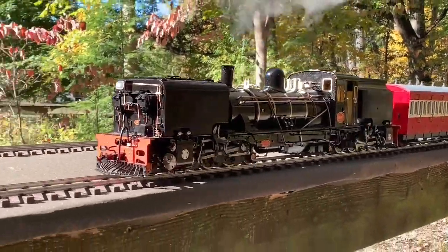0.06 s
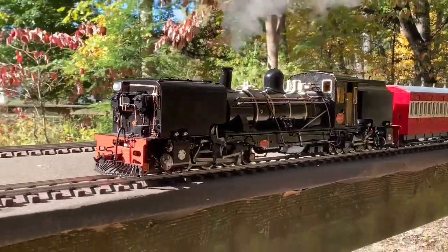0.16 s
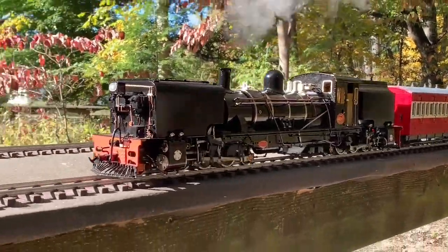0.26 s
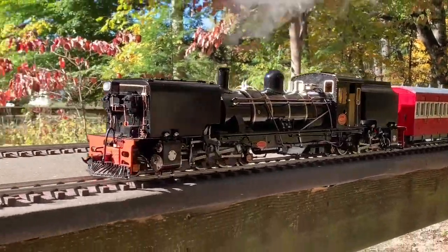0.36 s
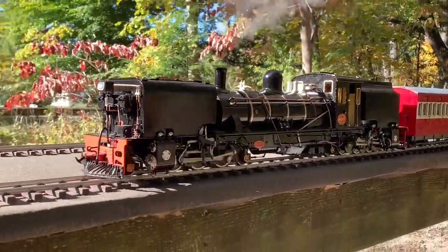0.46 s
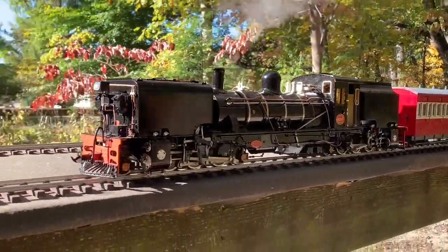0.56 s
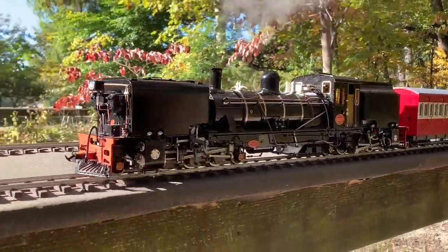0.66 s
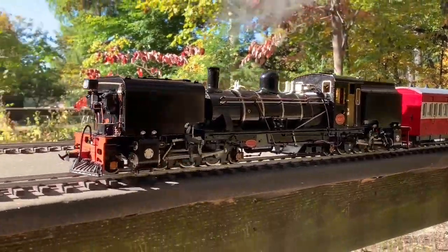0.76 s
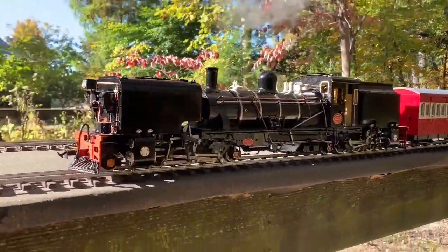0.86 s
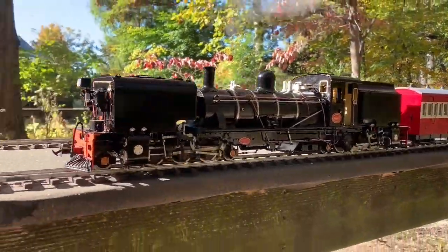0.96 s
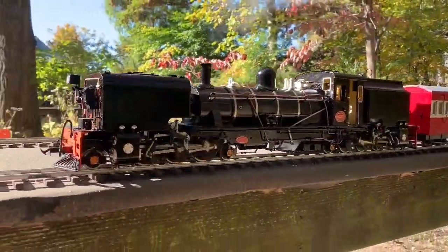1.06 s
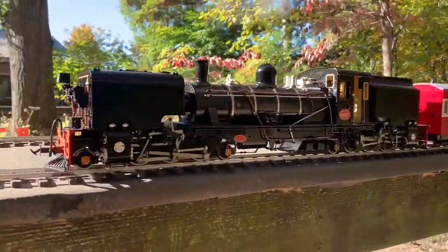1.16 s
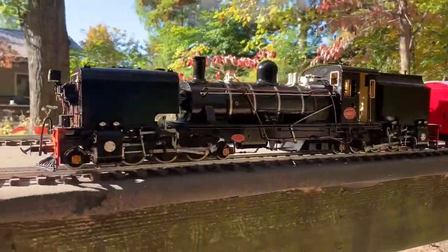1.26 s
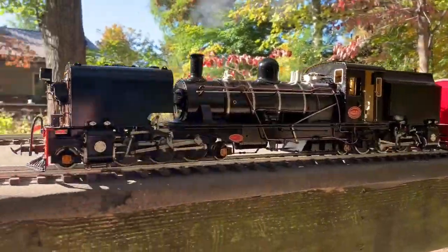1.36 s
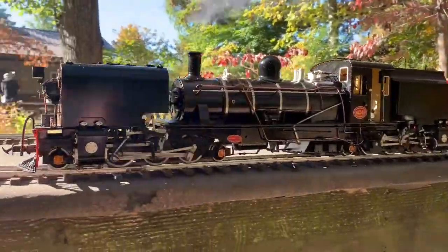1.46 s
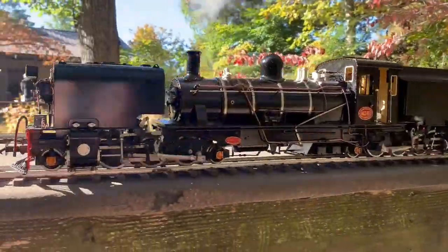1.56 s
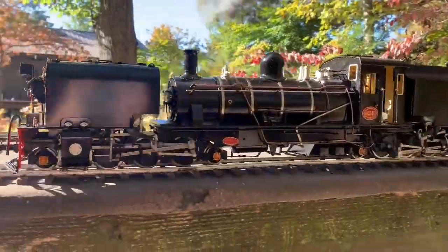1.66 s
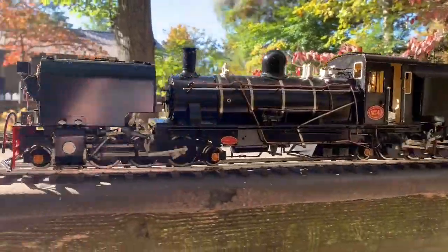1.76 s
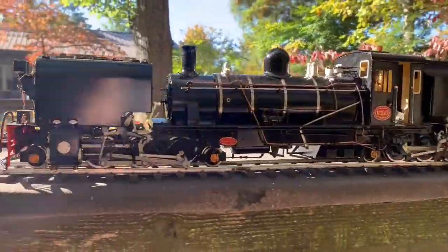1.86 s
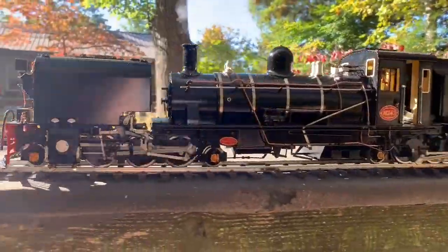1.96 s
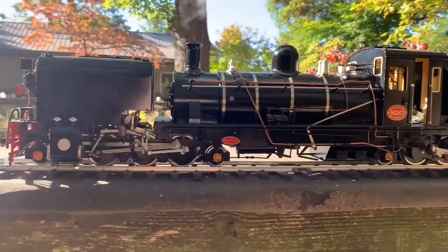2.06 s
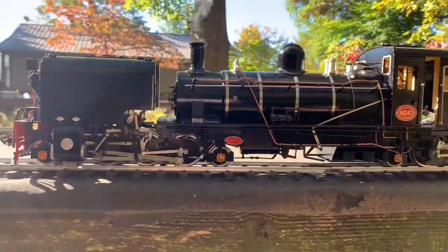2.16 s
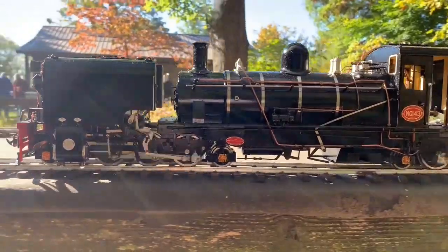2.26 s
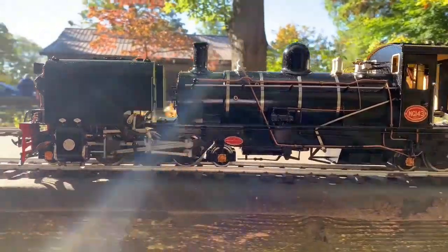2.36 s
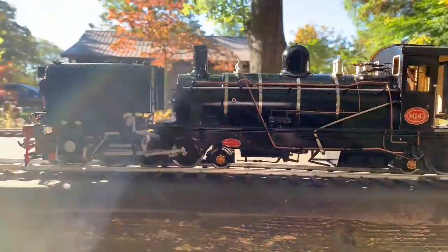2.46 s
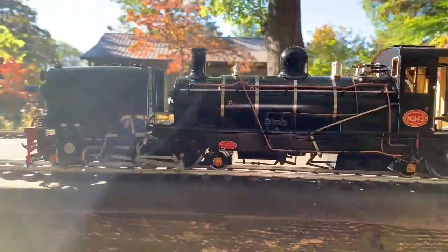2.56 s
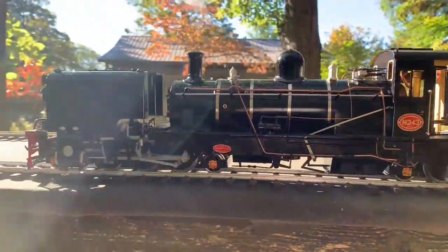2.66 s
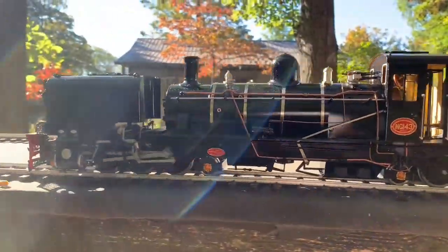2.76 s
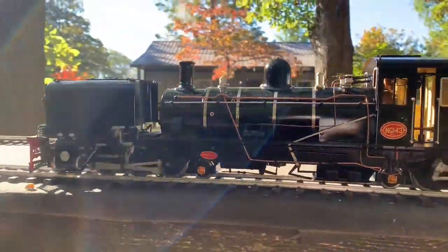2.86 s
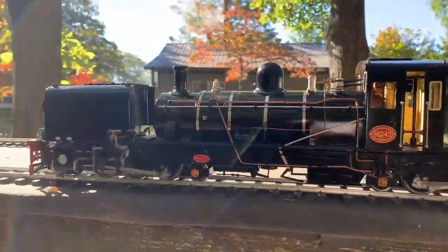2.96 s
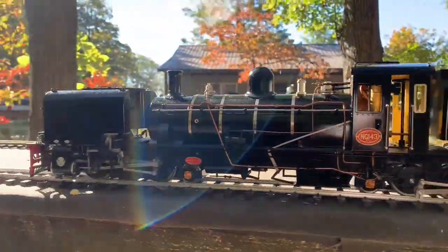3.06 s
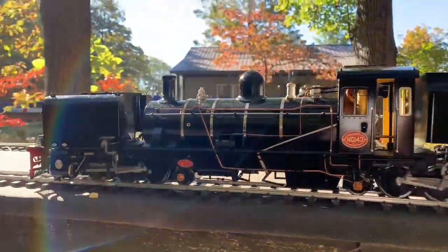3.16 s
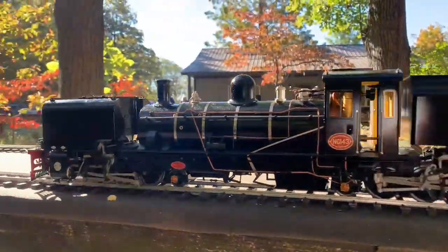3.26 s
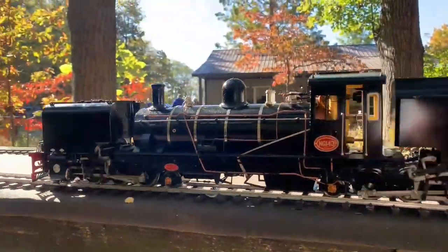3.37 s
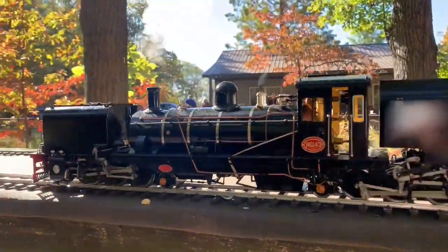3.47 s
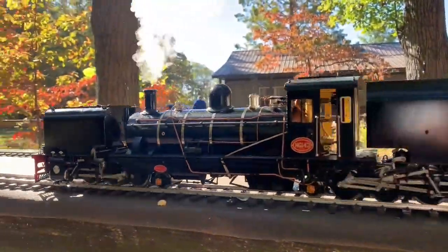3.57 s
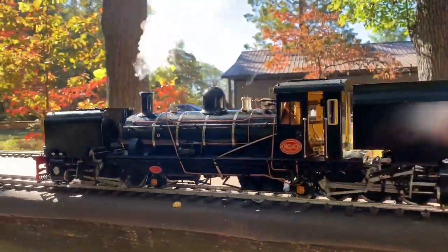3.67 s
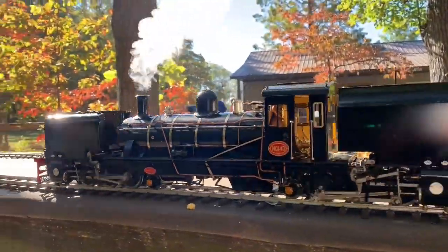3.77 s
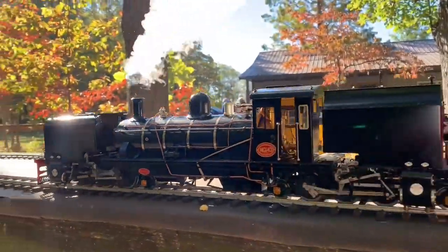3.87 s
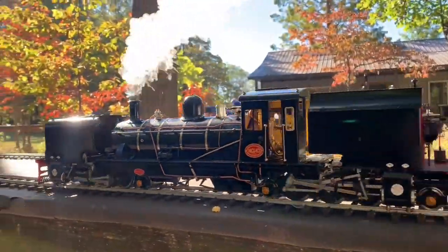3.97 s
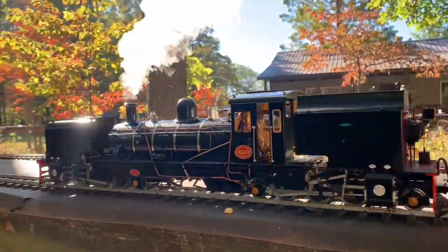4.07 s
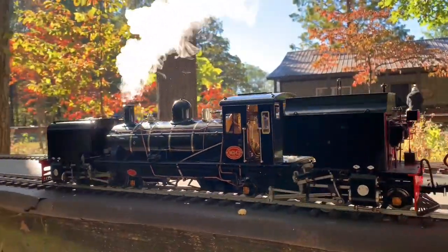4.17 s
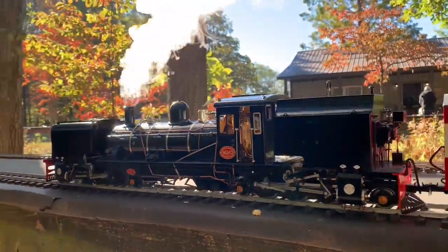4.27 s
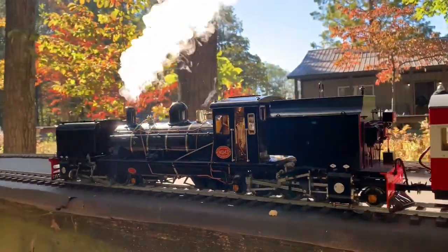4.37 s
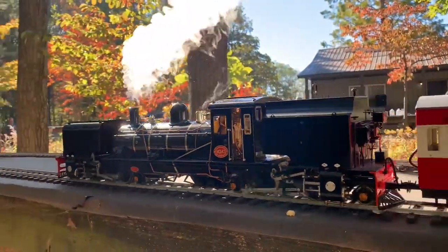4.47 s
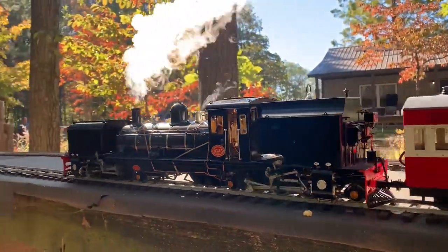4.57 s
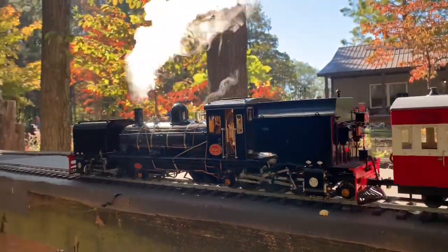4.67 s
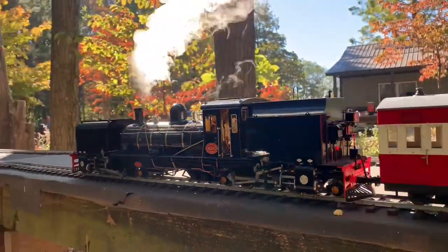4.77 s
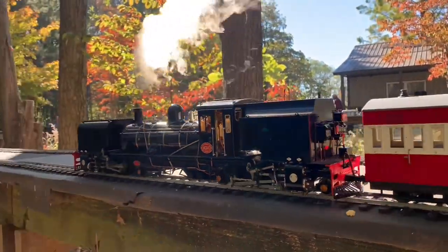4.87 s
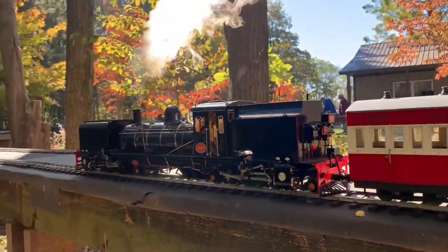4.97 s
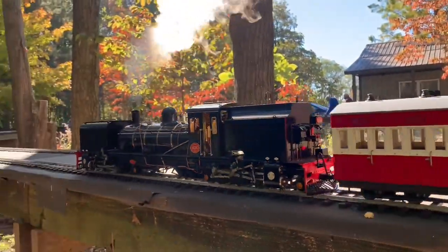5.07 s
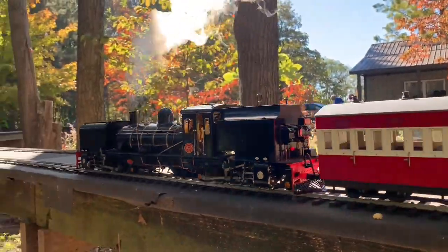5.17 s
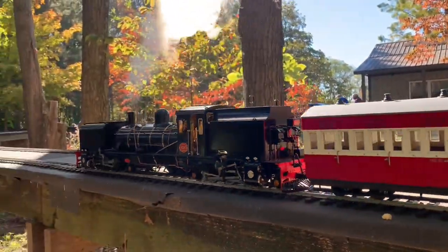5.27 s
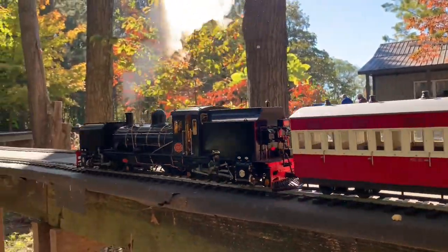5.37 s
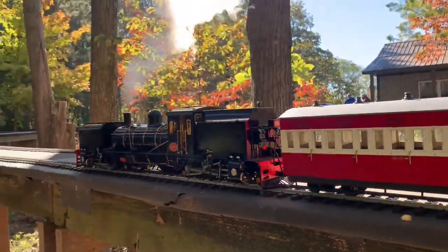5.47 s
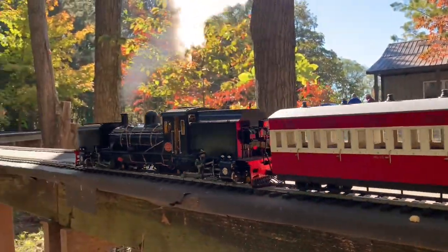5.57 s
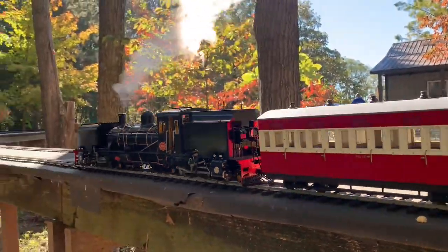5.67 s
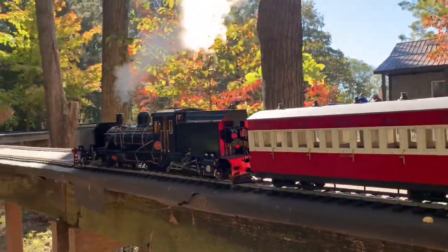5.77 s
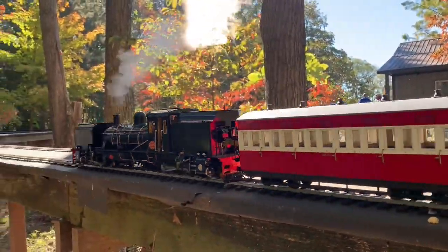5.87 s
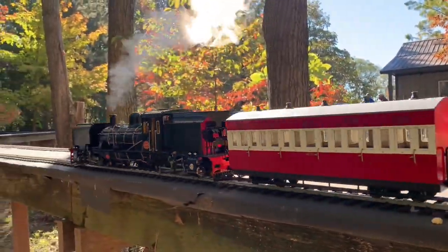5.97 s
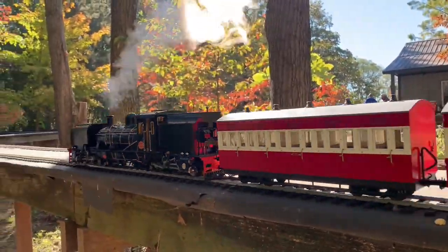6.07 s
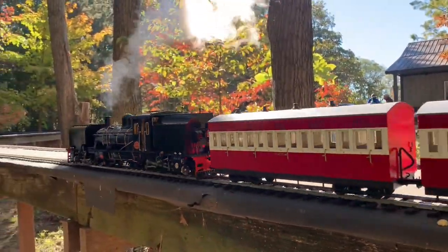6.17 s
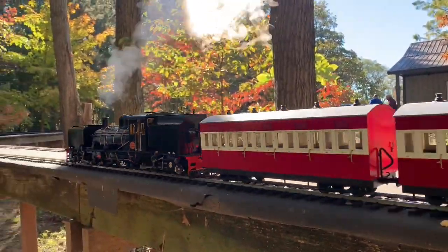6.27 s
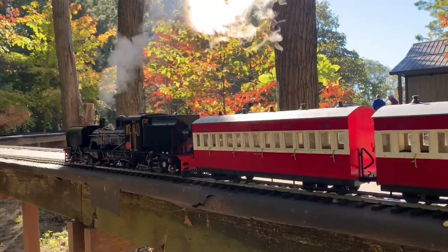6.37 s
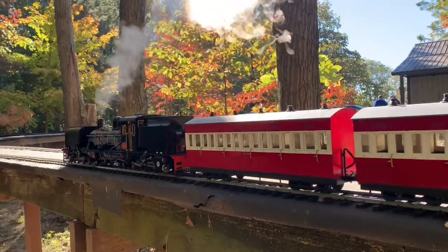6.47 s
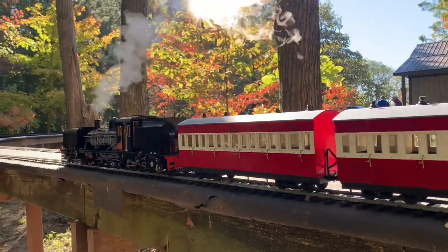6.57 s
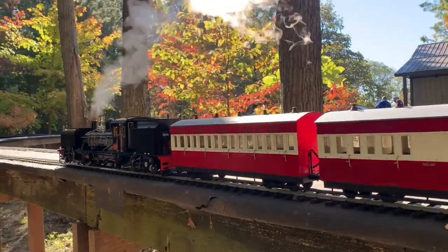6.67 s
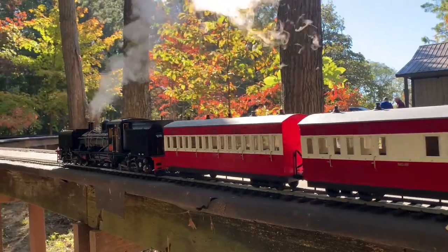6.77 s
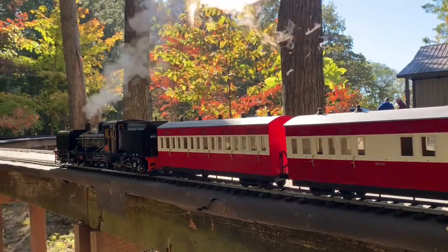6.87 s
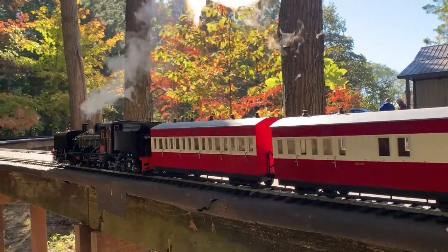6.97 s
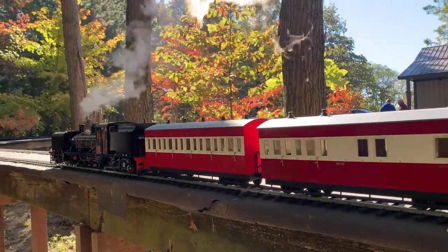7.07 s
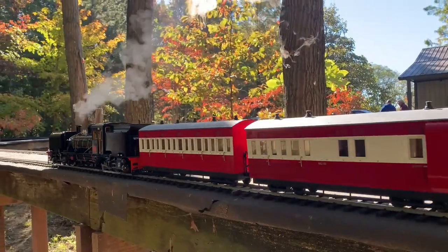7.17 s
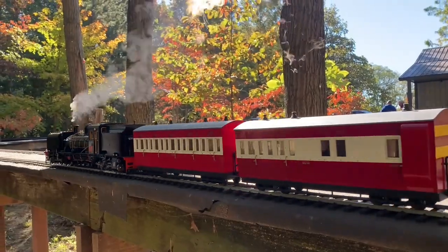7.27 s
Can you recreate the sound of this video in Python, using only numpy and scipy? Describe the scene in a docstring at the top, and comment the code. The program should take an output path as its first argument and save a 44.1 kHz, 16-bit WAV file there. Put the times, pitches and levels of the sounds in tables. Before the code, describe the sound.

A small live steam locomotive passes close by outdoors, burner roaring and exhaust hissing in quick wet beats, swelling near two seconds, then easing away with clacks.

```python
"""A live steam model locomotive comes up a raised garden track, heard close by over a low outdoor rumble.
From the start its burner roars in the flue and its exhaust hisses in quick uneven beats, spitting wet steam.
The wheels roll loudest early on; soon rods and wheels tick and the coach couplings knock.
Hiss and roar swell around two seconds, then the wooden deck drums under the nearest span.
The engine draws away, the steam now heard from behind, with a last run of knocks near the end.
All is shaped noise, heard by a pair of microphone ports in the open air."""
import sys
import numpy as np
from scipy import signal
from scipy.fft import rfft, irfft, next_fast_len
from scipy.io import wavfile
from scipy.ndimage import uniform_filter1d

SR = 44100
rng = np.random.default_rng(int(sys.argv[2]) if len(sys.argv) > 2 else 0)


def store_wav(level_fs):
    """Save 16-bit WAV to argv[1]."""
    pcm = np.round(np.clip(np.atleast_2d(level_fs), -1, 1) * 32767)
    wavfile.write(sys.argv[1], SR, pcm.T.astype(np.int16))


N = 322371
T = np.arange(N) / SR
HZ = np.fft.rfftfreq(N, 1 / SR)


def amp(db):
    """Decibels to gain."""
    return 10 ** (np.asarray(db) / 20)


def evened(x):
    """Scales to an rms of 1."""
    return x / np.sqrt(np.mean(x ** 2) + 1e-20)


def curve(rows, axis=1):
    """One column of a time table, at every sample."""
    rows = np.array(rows)
    return np.interp(T, rows[:, 0], rows[:, axis])


def read(points, hz):
    """A spectrum table, read along a log-frequency axis."""
    f, value = np.transpose(points)
    return np.interp(np.log(hz + 1), np.log(f + 1), value)


def add(mix, s, sound):
    """Mixes a sound in at a time in seconds."""
    part = mix[..., max(round(s * SR), 0):][..., :sound.shape[-1]]
    part += sound[..., :part.shape[-1]]


def resonance(hz, centre_hz, width_hz):
    """Gain of a resonance: 1 at its centre, a half at each edge of its width."""
    return 1 / (1 + (2 * (hz - centre_hz) / width_hz) ** 2)


def resonances(hz, modes):
    """Summed gain of several resonances, each with its own centre, width and level."""
    return sum(amp(db) * resonance(hz, f, width) for f, width, db in modes)


def wander(rate):
    """Smooth chance of rms 1, up to a rate per second."""
    return evened(irfft(rfft(rng.standard_normal(N)) / (1 + (HZ / rate) ** 4), N))


def left_lead(hz):
    """Radians by which the left leads the right, before any turn of bearing."""
    # phase between left and right, about opposite near 3 kHz, so the hiss sounds hollow: f/Hz, lead/rad
    lead_points = [(0, 0), (1200, 0.23), (2100, 1.0), (2600, 3.0), (3330, 3.2), (3720, 4.5), (4600, 5),
                   (5500, 4.1), (6400, 6), (7100, 5.4), (8300, 3.2), (8900, 3), (10400, 0.1), (11200, 0),
                   (13100, -3.1), (13700, -3.2), (15400, -6.2)]
    return np.interp(hz, *np.transpose(lead_points))


def directional(hz):
    """How much left-right phase follows a sound's direction: fully below 3.5 kHz, not at all above 8.3 kHz."""
    return np.interp(hz, [3500, 8300], [1, 0])


def noise(colour, size=N, scatter=1):
    """Coloured noise at left and right, shifted in phase and partly alike: less so the more it is scattered."""
    # likeness of left and right: f/Hz, likeness (0 to 1)
    likeness_points = [(40, 0.7), (150, 1), (500, 0.92), (1000, 0.91), (1600, 0.45), (2300, 0.6),
                       (2700, 0.975), (3250, 0.975), (3750, 0.72), (4600, 0.3), (5400, 0.55), (6000, 0.35),
                       (7500, 0.7), (8400, 1), (8900, 1), (9800, 0.78), (10800, 1), (12400, 0.8),
                       (13400, 1), (14500, 0.8), (15600, 1)]
    padded = next_fast_len(size, True)
    hz = np.fft.rfftfreq(padded, 1 / SR)
    left, other = rfft(rng.standard_normal((2, padded)))
    likeness = np.clip(read(likeness_points, hz), 0, 1)
    # scatter tells below 8.3 kHz only
    same = likeness ** (1 + (abs(scatter) - 1) * directional(hz))
    right = same * left + np.sqrt(1 - same ** 2) * other
    right = right * np.exp(-1j * left_lead(hz))
    pair = irfft(np.array([left, right]) * colour(hz), padded)
    return evened(pair[:, :size])


def shifted(x, by_hz):
    """Slides a narrow band of sound up or down along a curve."""
    turning = np.exp(2j * np.pi * np.cumsum(by_hz) / SR)
    return (signal.hilbert(x) * turning).real


def passing(closest_s, reach_s):
    """Gain of a source rolling by, as one over distance; it covers its closest distance in reach_s."""
    return 1 / np.hypot(1, (T - closest_s) / reach_s)


def crossing(at_s, length_s):
    """A smooth change from 0 to 1 around a moment."""
    return .5 + .5 * np.tanh((T - at_s) / length_s)


def sputter(per_s, spread_db, decay_s, share):
    """Uneven power of mean 1: random short bursts, mostly small and a few large, over a steady part."""
    struck = rng.random(N) < per_s / SR
    size = amp(spread_db * np.minimum(rng.exponential(1, N), 4)) * struck
    bursts = signal.lfilter([1], [1, -np.exp(-1 / (decay_s * SR))], size ** 2)
    share = np.clip(share, 0, 1)
    return 1 - share + share * bursts / bursts.mean()


def garden(level_db=-52, gust_db=0.1):
    """A low rumble from far around the garden, its level shifting very slightly."""
    # colour of the far rumble: f/Hz, level/dB (relative)
    rumble_colour = [(22, -38), (35, -17), (50, -9), (64, 1), (78, -4), (120, -9.5), (200, -6),
                     (500, -12.5), (1000, -7.5), (2000, -26), (8000, -93)]
    rumble = noise(lambda hz: amp(read(rumble_colour, hz)))
    return rumble * amp(level_db + gust_db * wander(rate=3.7))


def wheel_turns(start_turn=0.084):
    """Turns made by the driving wheels: their speed summed over time."""
    # speed of the driving wheels: t/s, speed/(turns/s)
    wheel_speed = [(0, 2.535), (2.4, 2.773), (4.8, 2.747), (7.31, 2.563)]
    return start_turn + np.cumsum(curve(wheel_speed)) / SR


def flue(waver_hz=8, middle_width_hz=190, middle_uneven_db=1.6):
    """The flame drives wavering low modes of the flue, and a middle one that drifts as the engine passes."""
    # low flue modes: f/Hz, width/Hz, level/dB (relative)
    low_modes = [(219.3, 30, 3), (295, 120, -5.5), (162, 170, -7)]
    # level of the low roar, before the flame's flutter: t/s, level/dB
    low_level = [(0, -49), (0.6, -46.5), (1.2, -44), (1.85, -42.5), (2.4, -43), (3.0, -43), (3.7, -45),
                 (4.3, -45.5), (5.1, -48.5), (6.5, -49), (6.85, -53), (7.31, -52.5)]
    # middle resonance, before the flame's unevenness and flutter: t/s, f/Hz, level/dB
    middle_course = [(0, 486, -52), (1.1, 470, -48.5), (1.8, 475, -46), (2.4, 509.5, -47.5),
                     (2.9, 520, -45.5), (3.6, 543.5, -48), (4.8, 526.4, -51), (6.0, 515, -52.5),
                     (7.31, 490.8, -60.5)]
    low = noise(lambda hz: resonances(hz, low_modes))
    roar = amp(curve(low_level)) * shifted(low, waver_hz * wander(rate=6.02))

    start_hz = middle_course[0][1]
    middle = noise(lambda hz: resonance(hz, start_hz, middle_width_hz))
    middle = shifted(middle, curve(middle_course) - start_hz)
    middle_db = curve(middle_course, axis=2) + middle_uneven_db * wander(rate=14)
    return roar + amp(middle_db) * middle


def chimney(lower_trim_db=0.8, draught_db=0.06, draught_turn=0.038):
    """Chimney modes fade between a lower and an upper voice; draught swells faintly twice per wheel turn."""
    # chimney modes: f/Hz, width/Hz, trim/dB, share by which each follows the upper voice in level and drift
    chimney_modes = [(747, 145, -1.7, 0.0162), (871, 205, -2.5, 0.5), (1023, 136, -1.35, 1),
                     (1340, 200, -18.5, 0.25)]
    # voice on the way past, before trims and flutter: t/s, lower level/dB, upper level/dB, full drift/Hz
    voice = [(0, -57.5, -57.5, 20), (0.9, -50.5, -48, 0), (1.4, -45, -41, -10), (2.0, -42, -41.5, 0),
             (2.55, -41.5, -44, -0.5), (2.95, -45, -51, -65), (3.3, -44, -49, -45),
             (3.55, -48.5, -47.5, -10), (3.8, -49.5, -46.5, 25), (4.2, -50, -47, 45),
             (4.55, -52, -51.5, -10.5), (5.7, -49.5, -52.5, -50.5), (6.6, -51.5, -63, -70.5),
             (7.31, -50.5, -60, -80.5)]
    draught = amp(draught_db * np.cos(2 * np.pi * 2 * (wheel_turns() - draught_turn)))
    lower_db = curve(voice) + lower_trim_db
    upper_db = curve(voice, axis=2)
    drift_hz = curve(voice, axis=3)
    roar = np.zeros((2, N))
    for f, width, trim_db, follows in chimney_modes:
        mode = shifted(noise(lambda hz: resonance(hz, f, width)), follows * drift_hz)
        roar += amp(lower_db + follows * (upper_db - lower_db) + trim_db) * draught * mode
    return roar


def burner(flutter_db=0.8):
    """The fluttering flame drives the modes of the flue and the chimney together."""
    return (flue() + chimney()) * amp(flutter_db * wander(rate=12.4))


def puff(age, rise=0.13, fall=0.51):
    """Power of a puff of steam, its age counted in puff lengths: it opens quickly and dies away."""
    opening = np.sin(np.pi / 2 * np.clip(age / rise, 0, 1)) ** 2
    return opening * np.exp(-(np.maximum(age - .5, 0) / fall) ** 2)


def beats(open_share=0.44, uneven_db=2.0):
    """Power of the exhaust beats, four to a wheel turn, no two quite alike."""
    # the four beats, unequal because of the valve timing, before chance: level/dB (over the leak)
    beat_db = [-9, -5.5, -3, -5]
    count = len(beat_db)
    number, since = np.divmod(count * wheel_turns(), 1)
    number = number.astype(int)
    chance_db = uneven_db * rng.standard_normal(number[-1] + 1)
    level_db = np.take(beat_db, number % count) + chance_db[number]
    return amp(level_db) ** 2 * puff(since / open_share)


def steam_power(leak_db=-37.5, closest_s=2.15, reach_s=1.67):
    """Power of the steady leak and the beats, swelling and fading with distance."""
    leak = (amp(leak_db) * passing(closest_s, reach_s)) ** 2
    return leak * (1 + beats())


def spurts():
    """Power of the wet steam spurts that stand out of the beats: in the lower hiss, and in the spray."""
    # spurts from the chimney: t/s, spray level/dB, length/s, lower hiss/dB (against the spray)
    spurt_times = [(0.066, -41, 0.068, 5), (0.197, -42, 0.04, -2), (0.41, -42, 0.13, 3),
                   (0.71, -37, 0.05, -5), (1.22, -47, 0.051, 6), (1.29, -43, 0.075, 8.5),
                   (1.345, -40, 0.13, 5.5), (1.851, -36, 0.084, -1), (2.062, -36, 0.072, 2),
                   (2.403, -35, 0.045, -1), (3.047, -35.5, 0.044, -3), (3.25, -41.5, 0.065, 3),
                   (3.351, -41.5, 0.066, 3), (3.79, -43, 0.029, 2), (3.84, -42, 0.12, -1),
                   (4.553, -49.5, 0.065, 8), (4.83, -49.5, 0.042, -5), (5.232, -48.5, 0.06, 6.5),
                   (5.44, -40.5, 0.05, 1), (5.532, -44, 0.053, -5), (5.715, -41, 0.093, 1),
                   (6.232, -42, 0.047, -2), (6.46, -44.5, 0.11, 0.5), (6.827, -45.5, 0.053, 4),
                   (7.004, -53, 0.059, 9.5)]
    power = np.zeros((2, N))
    for s, db, length_s, lower_db in spurt_times:
        both = amp([[db + lower_db], [db]]) ** 2
        add(power, s, both * puff(T[:SR // 2] / length_s))
    return power


def mottled(x, slow_db=2.0, quick_db=1.35):
    """Mottles the hiss with small random patches of level; the left-right lead follows the jet's bearing."""
    # how far off to the side the jet is heard: t/s, share of the full phase lead
    obliqueness = [(0, 0.19), (0.9, 0.46), (1.35, 0.8), (1.9, 1), (2.3, 0.76), (2.75, 0.9), (3.05, 0.73),
                   (3.45, 0.95), (4.6, 0.81), (5.4, 0.94), (7.31, 1)]
    hz, t, z = signal.stft(x, SR, nperseg=512, noverlap=384)

    def patches(size):
        """A smooth random field over (bins, frames)."""
        field = rng.standard_normal(z.shape[1:])
        field = uniform_filter1d(field, size[0], axis=0)
        return evened(uniform_filter1d(field, size[1], axis=1))

    # slow patches are narrow in frequency, quick ones wide
    z = z * amp(slow_db * patches(size=(2, 24)) + quick_db * patches(size=(12, 4)))
    # the nearer to head-on, the more of the right side's lag is undone
    head_on = 1 - np.interp(t, *np.transpose(obliqueness))
    z[1] *= np.exp(1j * np.outer(left_lead(hz) * directional(hz), head_on))
    return signal.istft(z, nperseg=512, noverlap=384)[1][:, :N]


def exhaust(ahead_db=-1, near_s=1.4, near_length_s=0.12, past_s=3.62, past_length_s=0.38, split_hz=9000):
    """The steam jet hisses and changes colour as the engine comes and goes."""
    # colour of the steam from ahead, from the side and from behind: f/Hz, level/dB (relative)
    ahead_colour = [(900, -9), (2300, -14), (3250, -3.5), (4200, -9), (5500, -3), (6400, -8), (7300, -5.5),
                    (7800, -5), (8150, 2.5), (9000, -1.5), (10300, -4), (11800, 1.5), (13300, -2.5),
                    (15700, -3)]
    side_colour = [(900, -15), (2300, -13), (3000, -1), (3800, 0.8), (4400, -5.5), (5600, -4), (6500, -7),
                   (7500, -4), (8200, -0.5), (9000, -2), (10500, -2.5), (11900, 0.5), (13300, -2),
                   (14600, -1), (15700, -3)]
    behind_colour = [(900, -27), (2300, -11), (2900, -5), (3600, -2.5), (4200, -5), (5500, -7.5),
                     (6600, -6.5), (7400, -8.5), (8200, -6.5), (8900, -0.5), (10500, -8), (11100, -8),
                     (12000, -5), (13300, -8.5), (14500, -6), (15700, -7)]
    ahead = 1 - crossing(near_s, near_length_s)
    behind = crossing(past_s, past_length_s)
    beside = (1 - ahead) * (1 - behind)
    jet = amp(ahead_db) * np.sqrt(ahead) * noise(lambda hz: amp(read(ahead_colour, hz)), scatter=1.7)
    jet += np.sqrt(beside) * noise(lambda hz: amp(read(side_colour, hz)))
    jet += np.sqrt(behind) * noise(lambda hz: amp(read(behind_colour, hz)), scatter=0.031)
    jet = mottled(jet)

    # large drops crackle in the lower hiss; the fine spray on top is smoother
    lower = irfft(rfft(jet) / (1 + (HZ / split_hz) ** 8), N)
    dry_power, (wet_lower, wet_spray) = steam_power(), spurts()
    crackle = (dry_power + wet_lower) * sputter(per_s=280, spread_db=8.5, decay_s=0.0063, share=0.12)
    spray = (dry_power + wet_spray) * sputter(per_s=3900, spread_db=7, decay_s=0.00062, share=0.17)
    return lower * np.sqrt(crackle) + (jet - lower) * np.sqrt(spray)


def click(low_hz=2000, decay_s=0.00054):
    """The bright snap of metal meeting metal: treble noise that dies at once."""
    t = T[:SR // 50]
    return noise(lambda hz: hz / (hz + low_hz), size=len(t)) * np.exp(-t / decay_s)


def strike(ring_hz, width_hz, decay_s, rise_s, wide_db, top_hz=13500):
    """A short, heavily damped ring with a broad clack around it."""
    t = T[:SR // 10]

    def colour(hz):
        """The ring's resonance and the clack's wide band."""
        clack = amp(wide_db) * hz / (hz + ring_hz) / (1 + (hz / top_hz) ** 4)
        return resonance(hz, ring_hz, width_hz) + clack

    return noise(colour, size=len(t)) * (1 - np.exp(-t / rise_s)) * np.exp(-t / decay_s)


def running_gear(tick_db=-9, knock_db=2, rolling_db=-50, closest_s=0.36, reach_s=3.26, ring_db=-1,
                 uneven_db=2.7):
    """Wheels rumble on the rails and the metalwork rings; small parts tick and the couplings knock."""
    # colour of wheels rolling on the rails: f/Hz, level/dB (relative)
    rolling_colour = [(100, -14), (370, 2.5), (620, 3.5), (1000, 0.5), (1400, -1.5), (1750, -4),
                      (2100, -7.5), (2500, -9.5), (3000, -35), (4500, -35)]
    # ringing modes of the metalwork: f/Hz, width/Hz, level/dB (relative)
    metal_modes = [(2103, 67, -3), (3730, 150, 0.5), (3410, 150, 1.5), (8080, 610, 1)]
    # how strongly the metalwork rings, before ring_db, sway and grit: t/s, level/dB
    ringing_level = [(0, -57), (1.5, -53), (2.7, -51), (3.55, -55), (3.85, -44.5), (4.4, -50), (5.7, -49.5),
                     (6.1, -55)]
    # ticks of rods, wheels and spat water, before tick_db: t/s, level/dB, ring f/Hz
    tick_times = [(0.5192, -19, 7240), (1.869, -20, 4290), (2.093, -21, 3920), (2.437, -22, 3500),
                  (3.203, -21, 4926), (3.27, -17, 6800), (3.273, -21, 7450), (3.3734, -19, 3500),
                  (3.855, -20, 3700), (4.069, -21, 3670), (4.568, -20, 8120), (5.2528, -22, 7880),
                  (6.241, -28, 9900), (6.39, -27, 6950), (6.4852, -23, 9300), (6.6077, -24, 6800),
                  (6.634, -24.5, 6700)]
    # knocks of couplings and of wheels on rail joints, ring level before knock_db:
    # t/s, ring level/dB, ring f/Hz, width/Hz, contact click level/dB
    knock_times = [(0.478, -47, 1700, 1200, -45), (0.634, -42.5, 1700, 1200, -39),
                   (1.726, -40, 1380, 900, -44), (2.29, -52, 1800, 700, -49), (2.31, -49, 1800, 700, -47),
                   (2.4125, -35.5, 1050, 600, -31), (2.415, -37, 3840, 1500, -36),
                   (6.261, -40, 1690, 600, -29), (6.275, -39, 1640, 600, -44), (6.283, -41, 550, 300, -50),
                   (6.297, -40, 550, 298, -55), (6.614, -45, 2000, 899, -43), (6.6205, -44, 1380, 400, -45),
                   (6.622, -37, 260, 300, -55), (6.634, -52, 2000, 1600, -29)]
    out = noise(lambda hz: amp(read(rolling_colour, hz))) * amp(rolling_db) * passing(closest_s, reach_s)
    ringing = noise(lambda hz: resonances(hz, metal_modes))
    out += ringing * amp(curve(ringing_level) + ring_db)
    # uneven track sways the rolling and ringing, and grit roughens both
    out *= amp(uneven_db * wander(rate=4.5))
    out *= np.sqrt(sputter(per_s=110, spread_db=1.8, decay_s=.005, share=.6))
    for s, db, hz in tick_times:
        tick = strike(hz, width_hz=600, decay_s=0.0028, rise_s=0.0003, wide_db=-2)
        add(out, s, amp(db + tick_db) * tick)
    for s, db, hz, width, click_db in knock_times:
        add(out, s, amp(click_db) * click())
        knock = strike(hz, width, decay_s=0.006, rise_s=0.00025, wide_db=-26)
        add(out, s, amp(db + knock_db) * knock)
    return out


def deck(level_db=-46, enters_s=2.5, leaves_s=3.77, ramp_s=0.31):
    """The wooden deck under the track drums in its board modes while the engine is on the nearest span."""
    # modes of the deck boards: f/Hz, width/Hz, level/dB (relative)
    board_modes = [(182, 80, 4.5), (295, 140, 1.5), (430, 130, 0)]
    on_span = crossing(enters_s, ramp_s) * (1 - crossing(leaves_s, ramp_s))
    boards = noise(lambda hz: resonances(hz, board_modes))
    return amp(level_db) * on_span * boards


def scene():
    """The train passing in the open garden."""
    return garden() + burner() + exhaust() + running_gear() + deck()


def record(dry, low_cut_hz=33, edge_hz=15850):
    """The lowest bass is cut, the left is a little duller in the presence range; then comes a band limit."""
    spectra = rfft(dry) * (1 - 1 / (1 + (HZ / low_cut_hz) ** 4))
    # response of the left: f/Hz, level/dB
    left_db = [(60, -0.8), (300, -0.34), (1500, 0.17), (3500, -1.0), (6000, -2.2), (9000, 0.1)]
    spectra[0] *= amp(read(left_db, HZ))
    lowpass = signal.firwin(511, edge_hz, window=("kaiser", 9), fs=SR)
    return signal.oaconvolve(irfft(spectra, N), lowpass[None], "same", axes=1)


dry = scene()
out = record(dry)
store_wav(out)
```